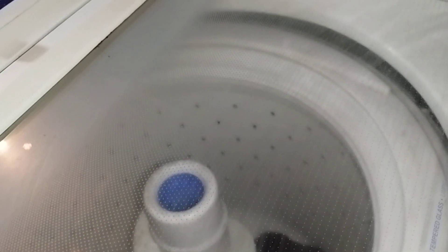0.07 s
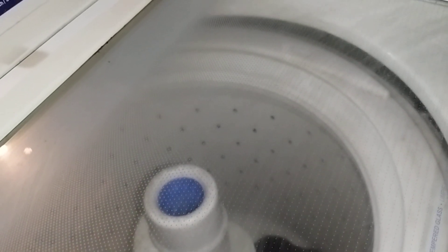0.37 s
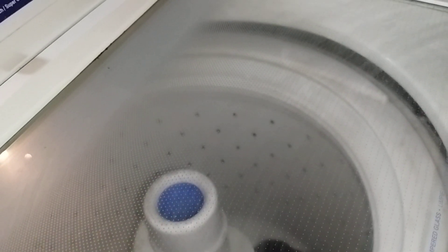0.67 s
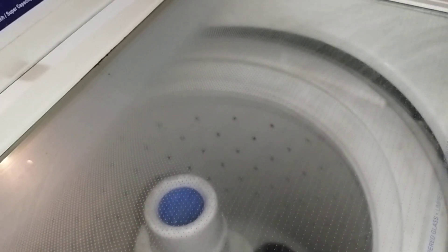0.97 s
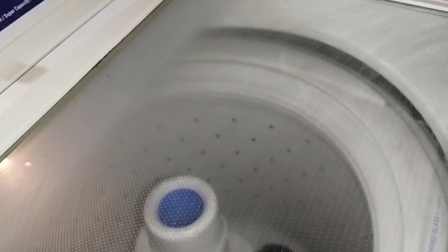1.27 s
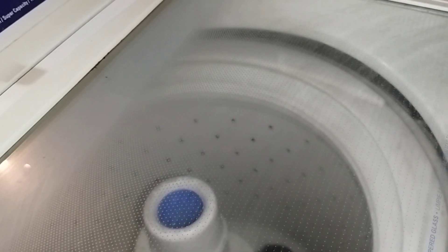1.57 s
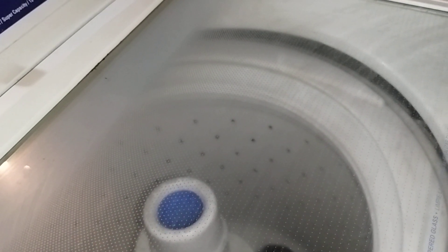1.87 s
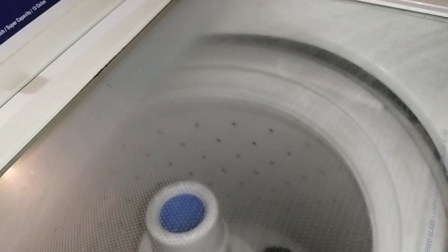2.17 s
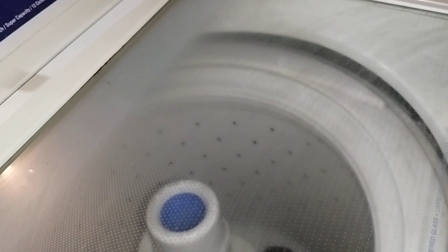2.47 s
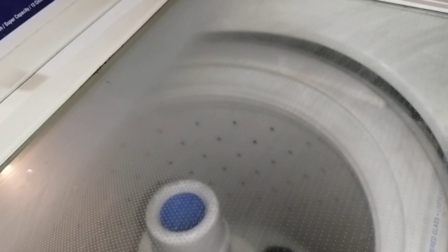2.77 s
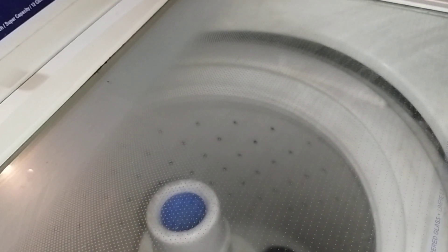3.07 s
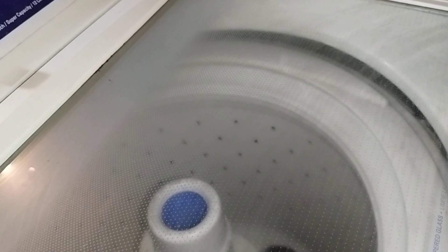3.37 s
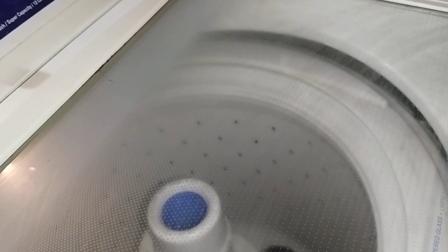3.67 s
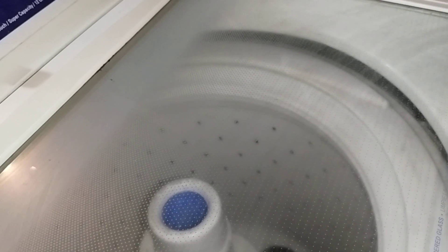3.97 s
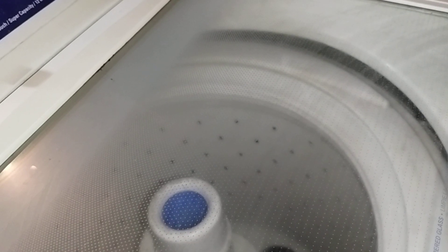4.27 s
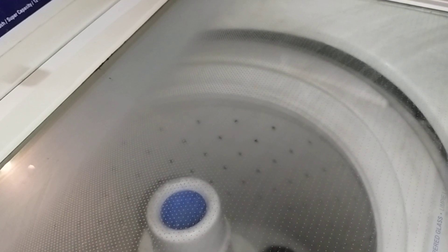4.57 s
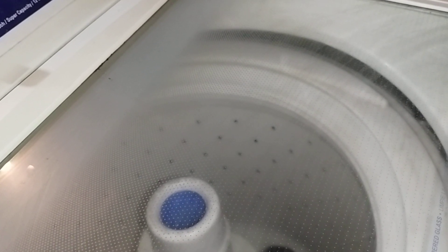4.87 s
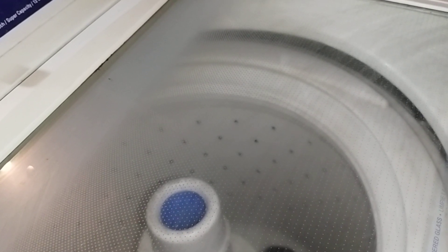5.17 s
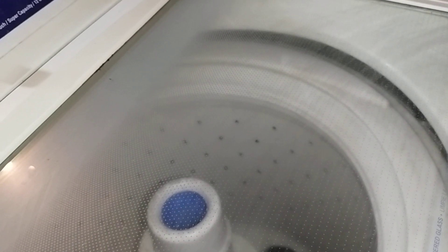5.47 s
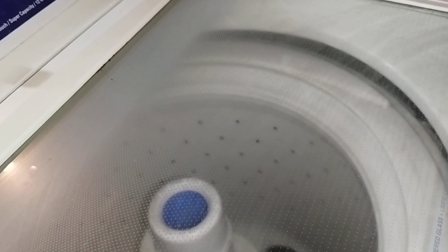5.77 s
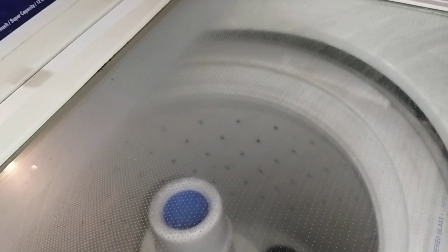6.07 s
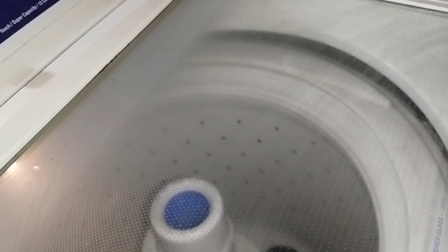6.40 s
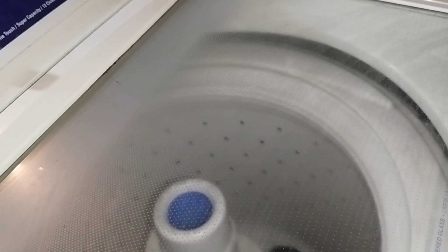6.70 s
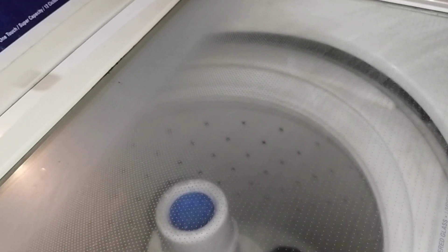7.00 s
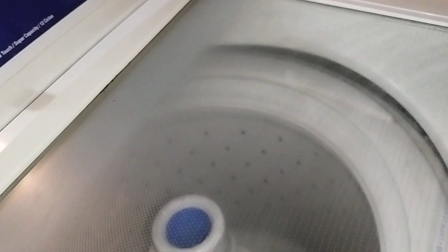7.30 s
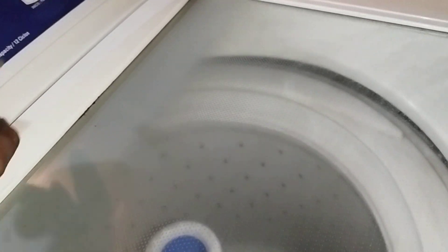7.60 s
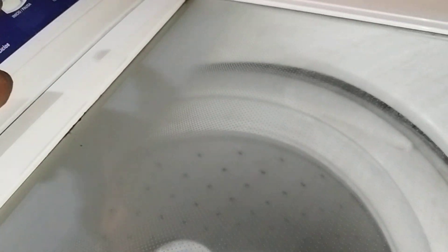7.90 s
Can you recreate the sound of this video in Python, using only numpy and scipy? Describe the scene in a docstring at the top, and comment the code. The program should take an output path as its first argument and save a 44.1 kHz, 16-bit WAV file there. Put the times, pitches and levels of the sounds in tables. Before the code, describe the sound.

Low pulsing rumble and faint rising whine of a spinning top-loading washer, ending with a soft bump and brush on the glass lid.

```python
"""Washing machine gathering spin

A top-loader speeds up, heard from just above its closed glass lid. Drive and cabinet drone in low,
gliding tones that beat against each other, the uneven load thumps, and a faint motor whine climbs.
Air rushes ever louder round the basket, panels ring, the rim scrapes lightly and the drive squeaks
thinly now and then. At the end a hand moves with a rustle and a rumble, then bumps and brushes the lid."""
import sys
import numpy as np
from scipy import signal
from scipy.fft import rfft, irfft
from scipy.io import wavfile

SR = 44100
rng = np.random.default_rng(int(sys.argv[2]) if len(sys.argv) > 2 else 0)


def pcm_store(signal):
    """Save signal as 16-bit PCM."""
    levels = np.round(np.clip(np.atleast_2d(signal), -1, 1) * 32767)
    wavfile.write(sys.argv[1], SR, levels.astype(np.int16).T)


N = 354696
TIME = np.arange(N) / SR
FREQS = np.maximum(np.arange(N // 2 + 1) * SR / N, 1)


def from_db(db):
    """Turn decibels into a number to multiply by."""
    return 10 ** (np.asarray(db) / 20)


def rms_one(x):
    """Scale a signal so its average strength (rms) is 1."""
    return x / np.sqrt(np.mean(x ** 2) + 1e-20)


def in_time(rows):
    """Join a table's points with lines: one curve for each column after the time."""
    times, *columns = np.transpose(rows)
    return [np.interp(TIME, times, column) for column in columns]


def over_freqs(rows):
    """Join a table's points across all frequencies, giving each octave equal space."""
    hz, values = np.transpose(rows)
    return np.interp(np.log(FREQS), np.log(hz), values)


def panned(lean_db):
    """Left and right gains; a positive lean makes the left louder."""
    return from_db(np.array([[.5], [-.5]]) * lean_db)


def drift(rate):
    """A smooth random wobble of size about 1, changing about rate times a second."""
    return rms_one(irfft(rfft(rng.standard_normal(N)) / (1 + (FREQS / rate) ** 2) ** 2, N))


def tone(hz):
    """A pure note of strength 1 that follows a moving pitch."""
    return np.sqrt(2) * np.sin(2 * np.pi * (np.cumsum(hz) / SR + rng.random()))


def resonance(centre_hz, width_hz):
    """A hump of height 1 round a frequency at which something likes to ring."""
    return 1 / (1 + (2 * (FREQS - centre_hz) / width_hz) ** 2)


def swell(start, length):
    """The samples a passing sound covers, and its rounded rise and fall."""
    on = (TIME >= start) & (TIME < start + length)
    return on, np.sin(np.pi * (TIME[on] - start) / length)


def ringing(rows):
    """For each row, a band of noise that swells and dies away."""
    out = np.zeros(N)
    hz_axis = np.arange(2 * SR + 1) / 4  # the frequencies in 4 s of noise
    for start, length, hz, width, level_db in rows:
        on, envelope = swell(start, length)
        band = 1 / (1 + ((hz_axis - hz) / width * 2) ** 4) ** .5
        noise = irfft(rfft(rng.standard_normal(4 * SR)) * band)
        out[on] += from_db(level_db) * envelope * rms_one(np.resize(noise, len(envelope)))
    return out


def room(x, fade_s, echo_db):
    """Add the room's echo, different at each ear, which falls 60 dB in fade_s."""
    tail = rng.standard_normal((2, SR)) * from_db(-60 * TIME[:SR] / fade_s)
    tail /= np.sqrt(np.sum(tail ** 2, axis=1, keepdims=True))
    return x + from_db(echo_db) * signal.fftconvolve(x, tail, axes=1)[:, :N]


def standing_waves(ripple_db=1.31, spacing_hz=21.8):
    """Many weak resonances of tub and room lift some frequencies a little and lower others, in dB."""
    grid = np.arange(0, SR / 2, 1.0)
    hump = np.exp(-(np.arange(-200, 201) * 2 / spacing_hz) ** 2)
    ripple = signal.fftconvolve(rng.standard_normal(len(grid)), hump, "same")
    return ripple_db * np.interp(FREQS, grid, rms_one(ripple))


# How alike the air sounds at both ears (1 = the same, 0 = unrelated): f/Hz, likeness
EAR_LIKENESS = [(60, .97), (250, .94), (370, .85), (480, .62), (640, .14), (750, .35), (950, .42),
                (1130, .05), (1400, -.28), (2000, .05), (9000, 0)]
# The air's mix of bass and treble at low speed: f/Hz, relative level/dB
AIR_COLOUR = [(18, 0), (28, 6.5), (60, 4), (105, 0.5), (200, -3.5), (350, -8), (420, -11.5), (600, -17),
              (950, -15), (1400, -20), (2200, -25), (3300, -32), (5000, -42), (9000, -47), (15500, -59.5)]
# Where tub and cabinet ring: f/Hz, width/Hz, boost/dB
TUB_RESONANCES = [(140, 32, 3), (226, 4.6, -0.5), (266.4, 11, 5), (344, 23, 3.5), (477, 21, 4),
                  (555, 21, 2.5), (716, 30, 1.5), (800, 36, 0.5), (1040, 29, 0), (1200, 150, 0),
                  (1680, 120, 1.5), (1960, 76, 1.5), (2300, 110, 1.5)]
# Which side the air is louder on: f/Hz, left minus right/dB
AIR_LEAN = [(60, 7.5), (250, -0.6), (500, 2), (700, -2), (880, 0), (1030, -3), (1200, -1.5), (1600, -2),
            (1900, -6), (2700, -4), (4800, -1.5), (6800, -5.5), (9000, 1.3), (15000, 1)]
# How the rush of air grows: t/s, relative level/dB
AIR_GROWTH = [(0.1, -56), (0.69, -55.5), (4.31, -54.5), (5.88, -51.5), (7.66, -46), (7.9, -46)]
# How strongly each range follows that growth, the bass least: f/Hz, share
GROWTH_SHARES = [(55, 0.3), (130, 0.65), (300, 0.96), (750, 1.14), (2200, 1.19), (6000, 1.37), (13000, .7)]


def airflow(slow_db=-41.5, slow_until_s=3.2, swirl_db=.5):
    """Air swirls round the basket, coloured by the tub: focused in the bass, spread out in the treble."""
    shared, opposite = rfft(rng.standard_normal((2, N)))
    alike = over_freqs(EAR_LIKENESS)
    spectrum = np.sqrt(1 + alike) * shared + np.sqrt(1 - alike) * opposite * [[1], [-1]]
    tub_db = sum(db * resonance(hz, width) for hz, width, db in TUB_RESONANCES)
    colour_db = over_freqs(AIR_COLOUR) + tub_db + standing_waves() * (FREQS > 150)
    spectrum *= from_db(colour_db) * panned(over_freqs(AIR_LEAN))
    spectrum *= from_db(slow_db) / np.std(irfft(spectrum, N))
    flow_db, = in_time(AIR_GROWTH)
    growth_db = flow_db - np.mean(flow_db[TIME < slow_until_s])
    centres, shares = np.transpose(GROWTH_SHARES)
    out = 0
    for this_band, share in zip(np.eye(len(centres)), shares):
        band = np.interp(np.log(FREQS), np.log(centres), this_band)  # fades into its neighbours
        out += irfft(spectrum * band, N) * from_db(share * growth_db + swirl_db * drift(10))
    return out


# How loudly the rim scrapes, until speed steadies the basket: t/s, level/dB
SCRAPE_LEVEL = [(0, -65.5), (.47, -70), (.56, -59), (.85, -58.5), (1.1, -61.5), (1.45, -62), (1.9, -60.5),
                (2.5, -64), (2.9, -63), (3.5, -68), (3.9, -90)]
# Where the rim rings: f/Hz, width before widening/Hz, relative level/dB
RIM_RESONANCES = [(1635, 100, 0), (1930, 260, -4), (2240, 110, -.5), (2670, 125, -1), (3230, 450, -12.5)]


def rim_scrape(wander_db=1.5, widening=1.5):
    """Rubbing sets the basket's rim ringing; its notes take turns as the contact moves."""
    level_db, = in_time(SCRAPE_LEVEL)
    friction = rfft(rng.standard_normal((2, N)))
    out = 0
    for hz, width, db in RIM_RESONANCES:
        ring = irfft(friction * resonance(hz, width * widening), N)
        out += ring * from_db(db + wander_db * drift(4))
    return from_db(level_db) * rms_one(out) * panned(lean_db=-3.5)


# Soft rubs and swishes, with a brief rustle as the hand moves: t/s, length/s, f/Hz, width/Hz, level/dB
RUBS_AND_RUSTLE = [(0, 0.22, 2710, 110, -69), (.45, .5, 2620, 180, -66.5), (.6, .6, 4250, 480, -75),
                   (.7, 1.25, 4450, 550, -77.5), (1.4, .35, 4330, 160, -79), (1.62, .42, 4740, 300, -77.5),
                   (2.6, 0.25, 8450, 4030, -76.5), (2.95, 0.85, 1607, 110, -62),
                   (3.15, 0.42, 2000, 450, -61.5), (3.15, 0.49, 4200, 700, -76),
                   (4.7, 0.38, 4162, 400, -73), (5.15, 0.24, 7000, 3475, -71.5),
                   (5.12, 0.3, 3600, 1400, -67.5), (5.9, 1.4, 1783, 900, -57), (7.1, 0.71, 2592, 2600, -57),
                   (7.24, 0.23, 6900, 5070, -64)]


def rubs_and_rustle():
    """Soft, high rubs come and go, and the moving hand rustles; each ear hears its own swish."""
    return np.array([ringing(RUBS_AND_RUSTLE), ringing(RUBS_AND_RUSTLE)]) * panned(lean_db=-4.0)


# Passing notes of the panels, and a low handling rumble near the end:
# t/s, length/s, f/Hz, width/Hz, level/dB
PANELS_AND_RUMBLE = [(.25, 0.4, 222, 10, -55), (0, 1.2, 164, 10, -52), (0, .6, 126, 16, -50),
                     (.98, 0.3, 404, 6, -53), (.85, 0.5, 225, 14, -53.5), (1.15, .6, 382, 7.5, -56),
                     (1.45, .45, 202.9, 5.3, -52.5), (1.85, 0.55, 130.4, 3, -48),
                     (2.65, .5, 130, 2.8, -48.5), (0.3, 4.4, 460, 70, -59.5), (.45, 2.6, 385, 70, -56),
                     (2.55, 0.45, 467, 16, -60), (3.7, 0.74, 168.4, 17, -51), (4.1, 1.14, 534, 14.2, -61.5),
                     (4.4, 0.41, 235.3, 2.4, -50), (4.75, 0.6, 129.6, 3.8, -45.5),
                     (5.35, 0.61, 231, 5, -48), (5.45, 0.44, 142, 7.3, -46), (5.55, 0.96, 257.4, 2.8, -46),
                     (5.0, 4.0, 500, 50, -57), (6.1, 4.9, 155.6, 19, -44.5), (6.8, 1.33, 302, 17, -46),
                     (6.0, 1.9, 223, 71, -47.5), (1.0, 1.17, 291, 42, -55.5), (3.0, 0.96, 150, 23, -51),
                     (3.9, 2.2, 582, 70, -61), (6.0, 3.6, 700, 220, -53), (2.4, 1.7, 850, 120, -64),
                     (0, 1.53, 863, 120, -63.5), (0, .9, 265, 50, -55), (7.0, 0.67, 83.5, 20, -42.5),
                     (7.1, 0.8, 257.2, 6.15, -45.5), (7.6, 0.81, 110, 40.6, -41), (7.65, 0.6, 491, 11, -53),
                     (6.7, .36, 129, 4, -44.5), (6.88, .26, 301, 8, -45), (7.27, .25, 128, 6, -39.5),
                     (7.45, .75, 154, 4, -43), (7.6, .7, 102.3, 4, -42)]


def panels_and_rumble():
    """Panels ring as the speed rises, and handling adds a late rumble; both ears hear the same."""
    return ringing(PANELS_AND_RUMBLE)


# Squeaks in the drive: t/s, length/s, f/Hz, waver/Hz, relative level/dB, left minus right/dB
DRIVE_SQUEAKS = [(0, 0.078, 10350, 25, -71.5, 0), (0.226, 0.066, 10320, 16, -78, 20),
                 (.47, .06, 8230, 20, -81, 0), (0.623, 0.19, 10700, 19, -85, 8),
                 (.62, .23, 12606, 17, -96, -4), (1.019, 0.18, 10280, 11, -75, 15),
                 (1.099, 0.079, 9390, 26, -82, 0), (1.178, 0.16, 10370, 11, -69, 13),
                 (1.19, .1, 8200, 25, -83, -3), (1.322, 0.053, 10560, 90, -69, 4),
                 (1.36, .1, 12550, 45, -82, 3.5), (1.454, .13, 12800, 29.6, -89, 1),
                 (1.85, 0.15, 8220, 25, -85, 0), (1.95, .25, 12620, 40, -90, 3),
                 (2.023, 0.081, 10350, 8.1, -77.5, 22), (2.382, 0.065, 6960, 60, -78, -12),
                 (2.737, 0.065, 10500, 100, -81, 26), (2.74, .08, 12550, 40, -87, 5),
                 (2.83, 0.11, 12900, 30, -89, 5), (3.324, 0.078, 9500, 5.8, -76, 8),
                 (3.43, .12, 11450, 30, -86, 5), (3.47, 0.11, 8180, 50, -85, 0),
                 (3.49, .1, 10530, 15, -86, 8), (3.477, .12, 12370, 34, -82.5, 8),
                 (3.582, 0.16, 10330, 108, -77, 10), (3.62, .09, 13080, 55, -85, 5),
                 (3.68, 0.079, 10050, 86, -75, 2), (3.72, .06, 11480, 40, -81, 5),
                 (3.85, .35, 12630, 55, -89, 0), (4.326, 0.16, 8080, 96, -78, 8),
                 (4.357, 0.11, 11830, 34, -87, 18), (4.45, 0.082, 12120, 45, -81.5, 4),
                 (4.523, .23, 8789, 50, -83, 0), (5.287, 0.16, 9990, 25, -73.5, 11),
                 (5.32, .14, 8140, 19.3, -83, 0), (5.903, 0.11, 10330, 11.1, -76.5, 14),
                 (6.182, 0.1, 9648, 15.4, -76, 4), (6.185, .29, 10330, 10.6, -73, 1.5),
                 (6.24, .09, 3085, 75, -59, -3), (6.35, 0.12, 8203, 42, -80, -1)]


def squeaks(gain_db=-5.5, flutter_hz=19.0, flutter_db=2.5, edge_s=0.017, rasp_hz=36.0):
    """Brief rubbing in the drive sings very high, fluttering as the parts turn."""
    waver, rasp = drift(120), rasp_hz * drift(500)
    out = np.zeros((2, N))
    for start, length, hz, waver_hz, level_db, lean_db in DRIVE_SQUEAKS:
        on = (TIME >= start) & (TIME < start + length)
        fade = np.clip(np.minimum(TIME[on] - start, start + length - TIME[on]) / edge_s, 0, 1)
        note = tone(hz + waver_hz * waver[on] + rasp[on])
        out[:, on] += from_db(level_db + gain_db) * fade * note * panned(lean_db)
    flutter = from_db(flutter_db * tone(flutter_hz + drift(3)))
    return room(out * flutter, fade_s=0.6, echo_db=0.5)


# The motor's climbing note: t/s, f/Hz, relative level/dB
MOTOR_NOTE = [(1.8, 246, -78), (2.08, 258, -52), (2.35, 274, -59), (2.7, 292, -56.5), (3.35, 307, -54),
              (3.9, 314, -59), (4.4, 319.7, -67), (5.27, 327, -63), (5.38, 330, -49), (5.65, 335, -46),
              (5.85, 341, -50), (6.25, 346, -50), (6.5, 350, -49), (6.62, 354, -45), (6.85, 354, -47.5),
              (7.12, 360, -43.5), (7.22, 355, -53), (7.37, 357, -45.5), (7.47, 357, -54), (7.6, 359, -45),
              (7.7, 356, -51), (7.85, 359, -40.5), (8.04, 357, -51)]


def motor_whine(gain_db=0.5, waver_db=1.6, waver_hz=3.6, breakup=.38, octave_db=-15.0):
    """A thin note and its faint octave climb with speed, wavering and breaking up as the load shifts."""
    hz, level_db = in_time(MOTOR_NOTE)
    wavering_hz = hz + waver_hz * drift(20.2)
    note = tone(wavering_hz) + breakup * drift(22) * tone(hz)
    note += from_db(octave_db) * tone(2 * wavering_hz)
    return from_db(level_db + gain_db + waver_db * drift(20)) * rms_one(note)


# The hand's bump on the lid: t/s, length/s, f/Hz, thud width/Hz, note level/dB, thud level/dB
LID_BUMPS = [(7.76, 0.18, 178.5, 110.4, -30, -37.5)]


def hand_bump():
    """A soft press makes the lid boom: a note inside a dull thud."""
    out = np.zeros(N)
    for start, length, hz, width, note_db, thud_db in LID_BUMPS:
        on, envelope = swell(start, length)
        out[on] += from_db(note_db) * envelope * tone(np.full(len(envelope), hz))
        out += ringing([(start, length, hz, width, thud_db)])
    return out


# The hand's slide over the lid: t/s, squeal f/Hz, relative squeal level/dB, relative scuff level/dB
LID_SLIDE = [(7.92, 9400, -95, -85), (7.945, 9450, -70, -70), (7.96, 9550, -60, -62),
             (7.974, 9500, -58, -55), (7.982, 10450, -42, -51), (7.987, 11100, -54, -48.5),
             (7.994, 12000, -62, -50), (8.0, 12900, -56, -53), (8.004, 13000, -70, -60),
             (8.01, 13100, -60, -62), (8.016, 13100, -95, -95)]
# The bright hiss of skin scuffing glass: f/Hz, relative level/dB
SCUFF_COLOUR = [(3000, -19), (6500, -1), (10000, -2), (13000, -6), (16000, -13)]


def hand_slide(squeal_gain_db=-6.0, scuff_gain_db=-0.5, waver_hz=420, rough_db=2.5):
    """Skin slides off the glass with a scuff and a short, broken, rising squeal."""
    hz, squeal_db, scuff_db = in_time(LID_SLIDE)
    squeal_gain = from_db(squeal_db + squeal_gain_db + rough_db * drift(496))
    squeal = squeal_gain * tone(hz + waver_hz * drift(830)) * panned(lean_db=21.0)
    hiss = irfft(rfft(rng.standard_normal((2, N))) * from_db(over_freqs(SCUFF_COLOUR)), N)
    scuff = from_db(scuff_db + scuff_gain_db) * rms_one(hiss) * panned(lean_db=2.5)
    started = TIME > LID_SLIDE[0][0]
    return room(started * (squeal + scuff), fade_s=0.42, echo_db=-15.5)


# Soft knocks of the uneven load: t/s, peak level/dB
LOAD_THUMPS = [(.1, -33), (.42, -30), (.595, -25), (.73, -33), (1.62, -31), (4.44, -35), (7.075, -31)]


def load_thumps(swing_hz=46, rise_s=.016):
    """The uneven load knocks the tub against its springs, and it swings a few times."""
    out = np.zeros(N)
    for start, peak_db in LOAD_THUMPS:
        age = np.maximum(TIME - start, 0)
        envelope = age / rise_s * np.exp(1 - age / rise_s)
        out += from_db(peak_db) * envelope * np.sin(2 * np.pi * swing_hz * age)
    return out


# The surges of the sinking drone: t/s, level/dB
SINKING_LEVEL = [(0, -35.5), (.3, -36), (.7, -33.5), (1.5, -36.5), (2.55, -38.5), (2.8, -41), (3.0, -40),
                 (3.35, -47.5), (3.8, -38.5), (4.15, -51), (4.5, -42.5), (4.75, -49), (5.15, -37),
                 (5.5, -47), (5.8, -36.5), (6.5, -62), (6.7, -90)]


def sinking_drone(top_hz=67.9, top_s=1.3, sag_hz_per_s2=0.68, wobble_hz=0.26):
    """A low note nearly holds its pitch, then sinks ever faster and fades in surges."""
    hz = top_hz - sag_hz_per_s2 * (TIME - top_s) ** 2
    level_db, = in_time(SINKING_LEVEL)
    return from_db(level_db) * tone(hz + wobble_hz * drift(4.8))


# The deep note near full speed: t/s, f/Hz, level/dB
LATE_NOTE = [(5.75, 41.03, -81.5), (5.88, 42.47, -36), (6.2, 50.4, -30), (6.45, 54.95, -48),
             (6.72, 50.8, -32.5), (6.96, 44.8, -34.5), (7.15, 38.47, -34.5), (7.47, 33, -43),
             (7.75, 30.35, -36.5), (8.04, 34.2, -34.5)]


def late_drone():
    """A deep, gliding note takes over as the spin nears full speed."""
    hz, level_db = in_time(LATE_NOTE)
    return from_db(level_db) * tone(hz)


# The drive's main note: t/s, f/Hz, level/dB, octave level/dB
DRIVE_NOTE = [(0.0, 39, -36.5, -40), (.15, 39.8, -47, -33.5), (.4, 41.42, -38, -43.5),
              (.6, 43.17, -34, -38), (.8, 46.58, -43, -45), (1.0, 44.95, -34.5, -42),
              (1.25, 42.6, -32, -38), (1.42, 40.57, -30, -25), (1.55, 38.8, -41, -37),
              (1.66, 37.5, -34, -30), (1.77, 36, -30, -45), (1.9, 36.5, -31.5, -38),
              (2.0, 38.44, -32.5, -32.5), (2.18, 41.3, -34, -31), (2.55, 42.57, -29.5, -33),
              (2.72, 42.8, -35, -39.5), (2.96, 45.9, -35.5, -43.5), (3.55, 47.63, -36, -49),
              (4.22, 46.3, -42.5, -46), (4.55, 44.5, -37.5, -50), (4.8, 42.45, -42.5, -51),
              (5.12, 41.14, -37, -41), (5.32, 39.2, -45, -45), (5.5, 38.54, -38, -33.5),
              (5.8, 37.35, -44, -43), (6.0, 36.8, -34.5, -45), (6.3, 35.8, -32, -55),
              (6.75, 32.96, -40.5, -60), (7.0, 35.1, -40, -53), (7.25, 39, -43, -33.5),
              (7.42, 42.1, -36.5, -50), (7.7, 48.5, -32.5, -49), (8.04, 50.5, -34.5, -53)]


def drive_drone(wobble_hz=0.16):
    """The drive hums a gliding note; the octave above booms when the cabinet rings along."""
    hz, level_db, octave_db = in_time(DRIVE_NOTE)
    hz += wobble_hz * drift(3)
    return from_db(level_db) * tone(hz) + from_db(octave_db) * tone(2 * hz)


def drones(waver_db=1.0):
    """The low notes of drive and cabinet together; the changing gaps in pitch make them throb."""
    notes = drive_drone() + sinking_drone() + late_drone()
    return notes * from_db(waver_db * drift(10)) * panned(lean_db=-1.0)


def scene():
    """The spinning machine and the hand on its lid."""
    out = drones() + load_thumps() + motor_whine() + airflow()
    out += rubs_and_rustle() + panels_and_rumble() + rim_scrape() + squeaks()
    return out + hand_bump() + hand_slide()


def record(dry, cutoff_hz=15700, ease_in_s=.003):
    """Ease the sound in without a click and cut away the very highest treble."""
    ease_in = np.clip(TIME / ease_in_s, 0, 1)
    low_pass = signal.ellip(10, .05, 70, cutoff_hz, fs=SR, output="sos")
    return signal.sosfiltfilt(low_pass, dry * ease_in)


dry = scene()
out = record(dry)
pcm_store(out)
```